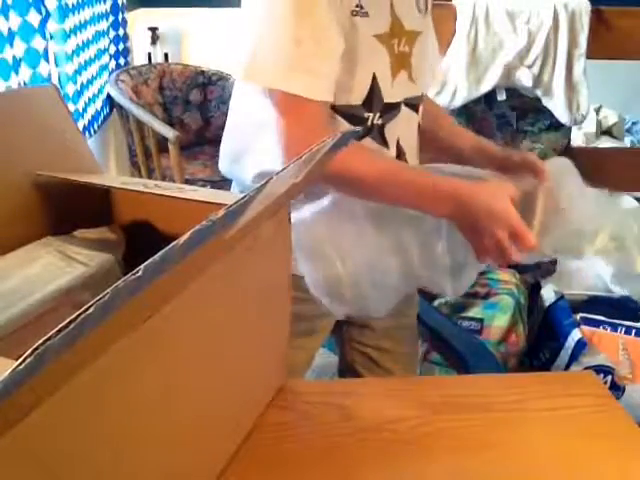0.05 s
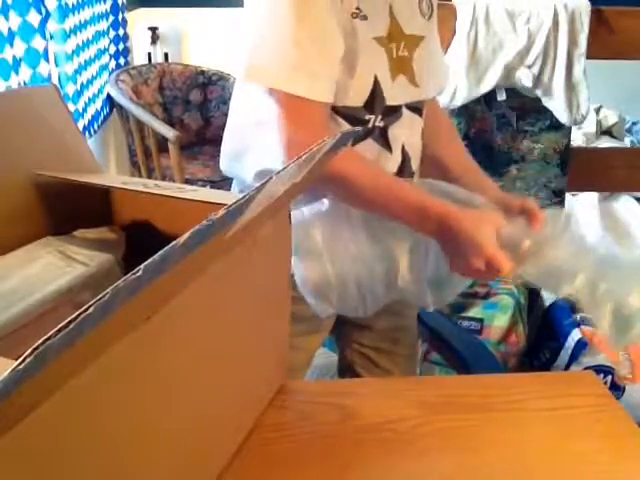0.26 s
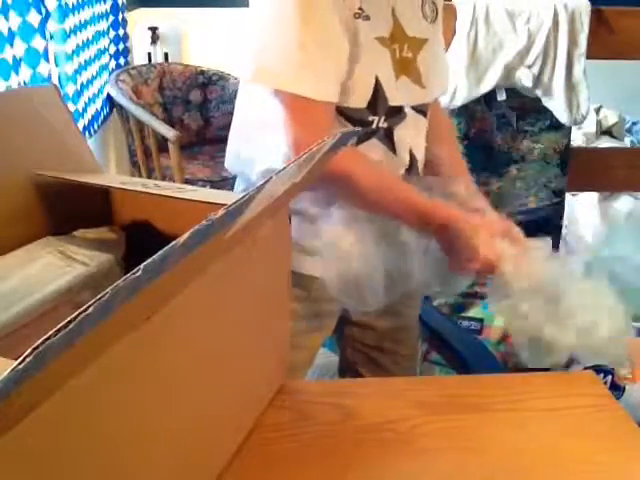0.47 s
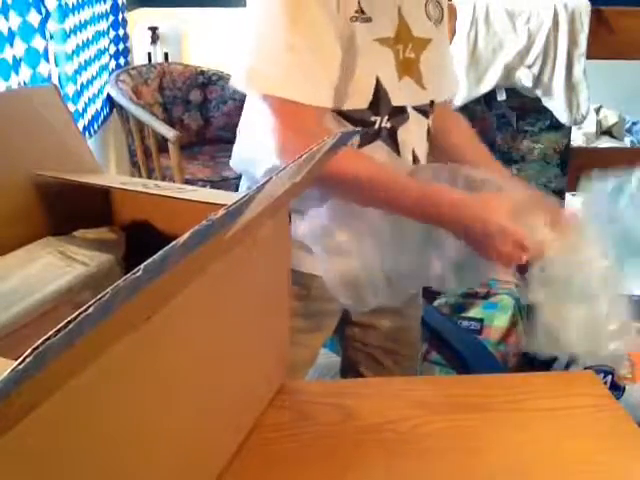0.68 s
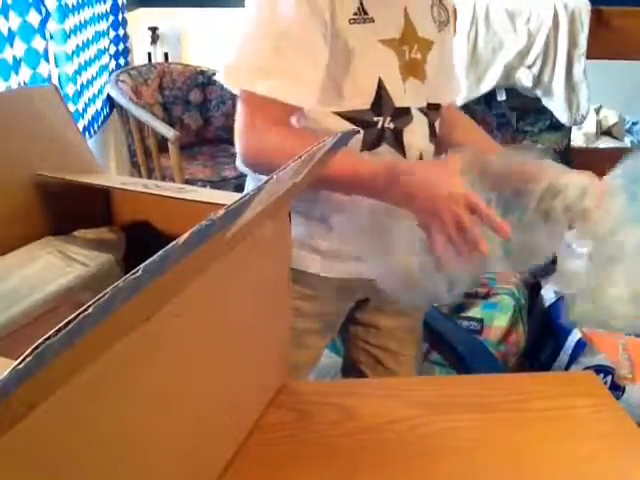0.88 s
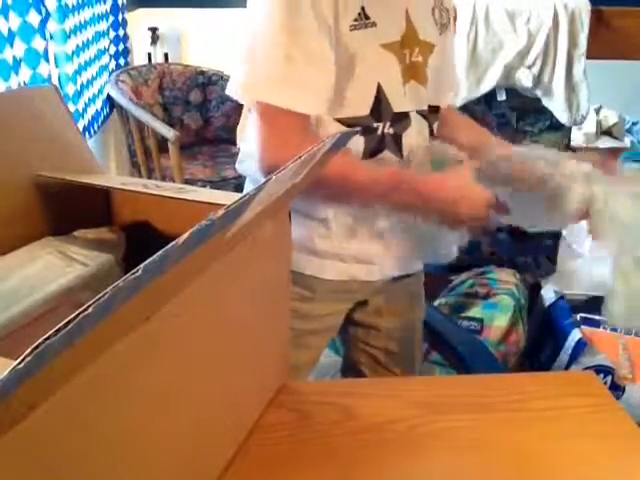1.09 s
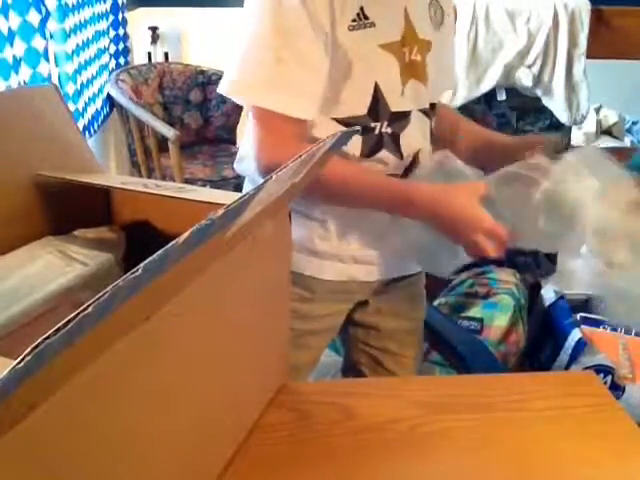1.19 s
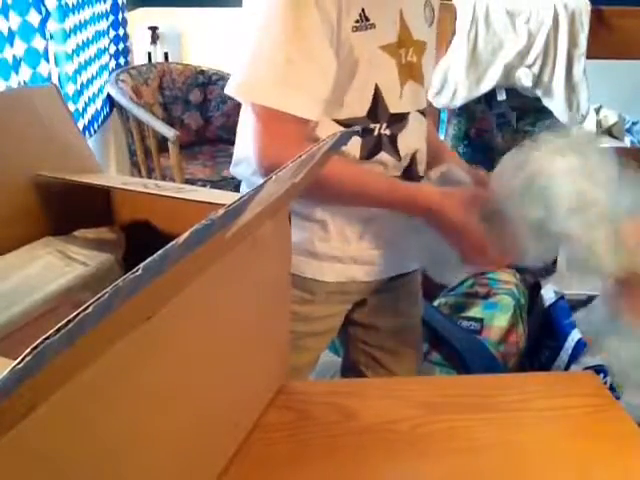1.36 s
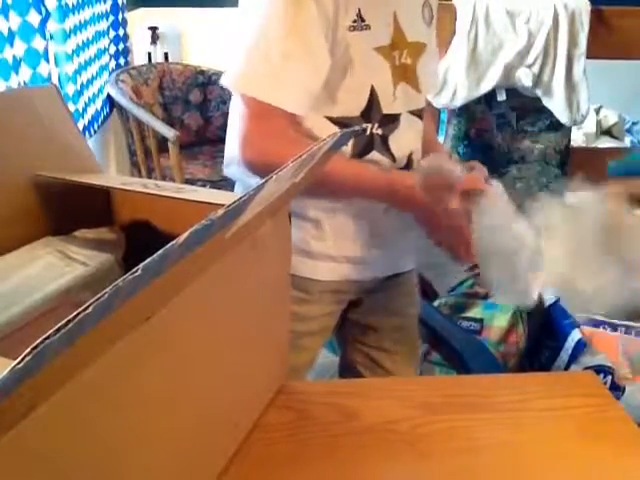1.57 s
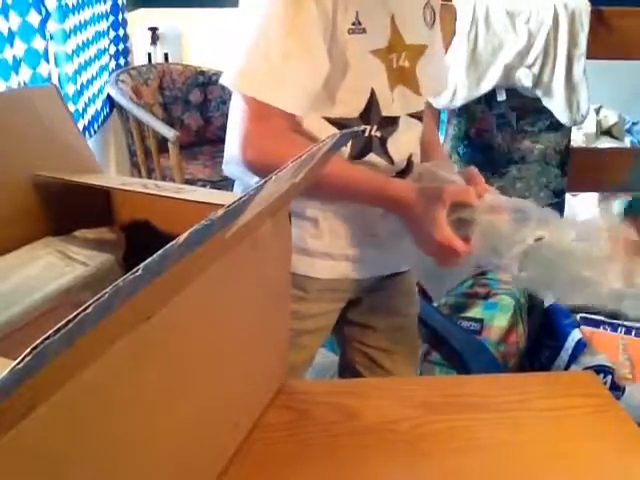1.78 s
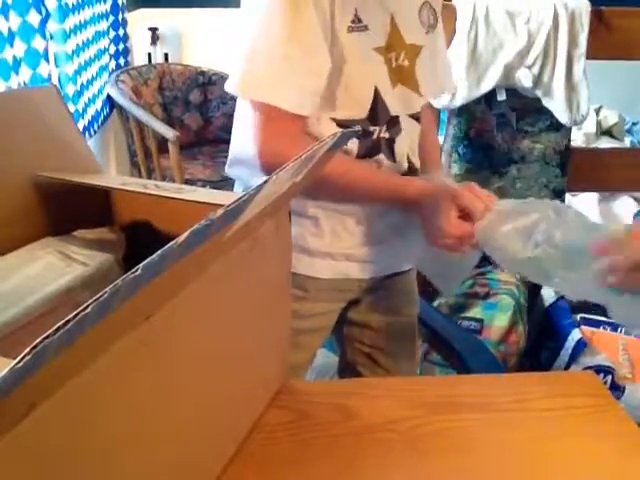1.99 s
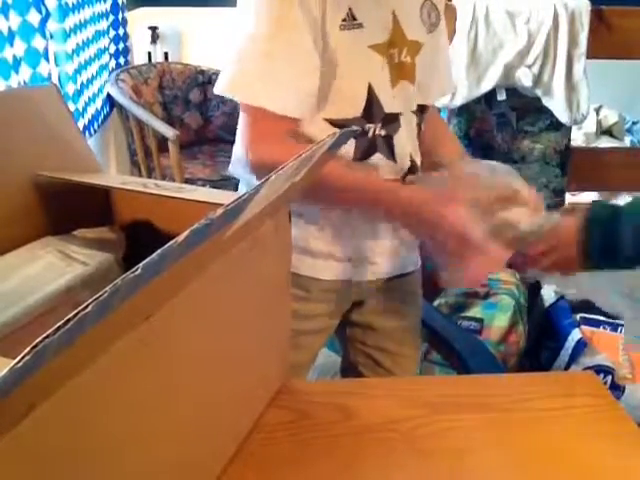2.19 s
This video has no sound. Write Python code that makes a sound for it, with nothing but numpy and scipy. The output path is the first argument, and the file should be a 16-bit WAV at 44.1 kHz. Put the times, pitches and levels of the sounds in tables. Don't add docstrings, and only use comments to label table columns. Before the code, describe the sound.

Hands twist air-filled plastic packaging about a metre from a phone microphone: two hollow cracking bursts, restless crinkling, a dense run of creaks and bright ticks, then one overloaded bang with short indoor reverberation.

```python
import sys
import numpy as np
from scipy import signal
from scipy.fft import rfft, irfft
from scipy.io import wavfile
from scipy.ndimage import uniform_filter1d

SR = 44100
rng = np.random.default_rng(int(sys.argv[2]) if len(sys.argv) > 2 else 0)


def inscribe(sig):
    pcm = np.round(np.clip(np.atleast_2d(sig).T, -1, 1) * 32767)
    wavfile.write(sys.argv[1], SR, pcm.astype(np.int16))


def linear_from_db(decibels):
    return 10 ** (np.asarray(decibels, float) / 20)


N = 99225

BANDS_HZ = 60 * 2 ** np.arange(0, 8.5, .5)


def along(table, hz, col):
    table = np.array(table)
    return np.interp(np.log(hz), np.log(table[:, 0]), table[:, col])


def band(x, hz):
    f = np.maximum(np.arange(len(x) // 2 + 1) * SR / len(x), 1)
    octaves_off = np.clip(np.log2(f / hz), -.5, .5)
    return irfft(rfft(x) * np.cos(np.pi * octaves_off) ** 2, len(x))


def add(out, s, x):
    i = int(s * SR)
    out[i:i + len(x)] += x[:N - i]


def highpass(x, order, hz):
    return signal.sosfilt(signal.butter(order, hz, "high", fs=SR, output="sos"), x)


def walk(rate):
    hold = int(SR / rate)
    steps = np.repeat(rng.standard_normal(N // hold + 1), hold)
    return 1.3 * uniform_filter1d(uniform_filter1d(steps, hold), hold)[:N]


def rustle():
    # (time [s], rustle level [dB], dullness [dB per octave])
    handling = [(0, -43.5, 0.5), (.17, -39, -1), (.3, -51, 4.5), (.63, -51.5, 1.5), (0.748, -41, -0.5),
                (.88, -43.5, -0.4), (1.028, -34, -0.05), (1.19, -37.5, 0.3), (1.258, -33, -1),
                (1.34, -38, 1), (1.419, -29.5, -0.5), (1.52, -32, 2), (1.64, -30.5, -0.5), (1.76, -34, 0),
                (1.879, -29, -1), (2.07, -53.5, 9), (2.18, -39, 0.5), (2.25, -45.5, 0.5)]
    # (frequency [Hz], level [dB per Hz])
    film_colour = [(60, -62), (120, -5.5), (320, -1), (800, 0.5), (2100, 2.5), (6000, 2.5), (12000, 3.5),
                   (15500, 0.5)]
    folds_per_s, spread_db, flicker_db, rustle_db = 12000, 2.5, 1.1, 1.5
    t, hands = np.arange(N) / SR, np.array(handling)
    level = np.interp(t, hands[:, 0], hands[:, 1])
    dull = np.clip(np.interp(t, hands[:, 0], hands[:, 2]), -1.5, 1)

    shared_flicker = walk(13.8)
    chance = rng.random((3, N))
    snaps = chance[0] < folds_per_s / SR
    polarity = np.sign(chance[1] - .5)
    strength = linear_from_db(-spread_db * np.log(np.maximum(chance[2], 1 / 150)))
    folds = snaps * polarity * strength
    folds = folds / folds.std()

    out = 0
    for hz in BANDS_HZ:
        db = along(film_colour, hz, 1) + level + dull * np.log2(9000 / hz)
        db = db + flicker_db * (shared_flicker + walk(11.97))
        out = out + linear_from_db(db) * band(folds, hz)
    return out * linear_from_db(rustle_db)


def room(x, wet_db=0, direct=1):
    # (frequency [Hz], 60 dB decay time [s], tail level [dB])
    decay = [(78.7, .4, -4), (212, 0.38, -5.5), (524, 0.43, -11.5), (1000, 0.52, -11), (1740, 0.49, -9.5),
             (3600, 0.41, -11), (9440, 0.31, -15.5)]
    build_ms, early_db, early_ms = 0.75, 10, 8.4
    t = np.arange(SR) / SR
    noise = rng.standard_normal(len(t)) * np.sqrt(1000 / SR)
    tail = 0
    for hz in BANDS_HZ:
        fade_db = along(decay, hz, 2) - 60 * t / along(decay, hz, 1)
        tail = tail + linear_from_db(fade_db) * band(noise, hz)
    build = 1 - np.exp(-t * 1000 / build_ms)
    early = linear_from_db(early_db * np.exp(-t * 1000 / early_ms))
    response = tail * build * early * linear_from_db(wet_db)
    response[0] += direct
    return signal.fftconvolve(x, response)[:max(len(x), len(t))]


def ring(hz, q):
    t = np.arange(SR // 20) / SR
    y = np.sin(2 * np.pi * hz * t) * np.exp(-np.pi * hz * t / q)
    return y / y.max()


def creak_slips():
    # (time [s], peak level [dB], pitch [Hz])
    creak_events = [(0.325, -40, 760), (1.47, -11, 1340), (1.4861, -4, 1920), (1.4944, -8.5, 920),
                    (1.4981, -16, 860), (1.5154, -4, 1940), (1.524, -12, 2650), (1.529, -3.5, 3300),
                    (1.536, -6, 3220), (1.5383, -16, 3500), (1.5458, -6, 2040), (1.5496, -10.5, 1470),
                    (1.56, -33, 2500), (1.574, -10, 1330), (1.583, -36, 2200), (1.594, -36, 1220),
                    (1.608, -9.5, 2060), (1.614, -8.5, 2970), (1.624, -17, 1480), (1.64, -28.5, 2500),
                    (.105, -27, 1100)]
    creak_db, edge_db, body_db = -6.5, -2, -9
    squeeze_from_s, squeeze_to_s = 1.46, 1.525
    out, t = np.zeros(N), np.arange(SR // 20) / SR
    soft = signal.butter(2, 8000, fs=SR, output="sos")
    for s, db, hz in creak_events:
        edge = signal.sosfilt(soft, rng.standard_normal(len(t))) * np.exp(-t / 0.0014)
        slip = ring(hz, 1.8) + linear_from_db(edge_db) * edge
        if squeeze_from_s < s < squeeze_to_s:
            slip = slip - linear_from_db(body_db) * ring(320, 2.5)
        add(out, s, linear_from_db(db + creak_db) * slip)
    return out


def stretch_ticks():
    # (time [s], peak level [dB], pitch [Hz])
    tick_events = [(0.1328, -23, 6000), (0.1745, -15, 5110), (0.373, -22, 3840), (1.6712, -15, 3800),
                   (1.6768, -9, 3800), (1.6829, -8, 3900), (1.6892, -8, 4300), (1.6955, -17, 3840),
                   (1.702, -6, 4500), (1.7065, -16, 5150), (1.7091, -6, 4500), (1.7158, -11, 3700),
                   (1.7195, -13, 3300), (1.7284, -20, 4500)]
    tick_db = 2.5
    out = np.zeros(N)
    for s, db, hz in tick_events:
        add(out, s, -linear_from_db(db + tick_db) * ring(hz, 3.8))
    return highpass(out, 2, 2300)


def slips():
    creak_room_db, tick_room_db = -6, -4
    table_ms, table_db = .97, 0
    creaks, ticks = creak_slips(), stretch_ticks()
    out = room(creaks, creak_room_db) + room(ticks, tick_room_db)
    out = out + linear_from_db(table_db) * np.roll(creaks + ticks, int(table_ms * SR / 1000))
    return highpass(out, 2, 199)


def air_bursts():
    # (time [s], level [dB], lowest frequency [Hz], highest frequency [Hz])
    bursts = [
        (0.2022, 2, 315, 1097),
        (0.4512, -4.5, 259.5, 860),
        (1.9244, 2.5, 336, 1000),
    ]
    out = np.zeros(N)
    click = 1. * (np.arange(SR // 20) == 0)
    for s, db, lo_hz, hi_hz in bursts:
        push = signal.sosfilt(signal.butter(3, [lo_hz, hi_hz], "band", fs=SR, output="sos"), click)
        add(out, s, linear_from_db(db) * room(push / push.max()))
    return out


def seam_tears():
    # (time [s], level [dB], fade [ms], tilt [dB per octave])
    tears = [
        (0.2021, -12, 3.1, -2),
        (0.449, -9, 4.9, -0.5),
        (1.9254, -3.5, 1.2, -2.5),
    ]
    low_hz, snap_db, tear_room_db = 1100, 3.5, 22.5
    out, t = np.zeros(N), np.arange(SR // 20) / SR
    click = 1. * (np.arange(SR + len(t)) == 0)
    for s, db, fade_ms, tilt_db in tears:
        crack = rng.standard_normal(len(t)) * np.exp(-t * 1000 / fade_ms)
        crack[:4] = linear_from_db(snap_db)
        whole = np.pad(crack, (0, SR)) + room(click, tear_room_db, direct=0)
        bright = 0
        for hz in BANDS_HZ[BANDS_HZ > low_hz]:
            bright = bright + linear_from_db(tilt_db * np.log2(hz / low_hz)) * band(whole, hz)
        add(out, s, linear_from_db(db) * bright)
    return out


def boom():
    # (time [s], level [dB])
    jolts = [
        (0.202, -33.5),
        (0.45, -26),
        (1.001, -51),
        (1.149, -59),
        (1.479, -52),
        (1.731, -43.5),
        (1.928, -27.5),
    ]
    mode_hz, t60_s, rise_ms = 122, .5, 15
    out, t = np.zeros(N), np.arange(SR) / SR
    swell = (1 - np.exp(-t * 1000 / rise_ms)) ** 2 * np.sin(2 * np.pi * mode_hz * t)
    for s, db in jolts:
        add(out, s, linear_from_db(db - 60 * t / t60_s) * swell)
    return out


def scene():
    rustle_room_db, hiss_db = -14.5, -56
    film = room(rustle(), rustle_room_db) + slips() + air_bursts() + seam_tears()
    hiss = linear_from_db(hiss_db) * rng.standard_normal(N)
    return (film + boom() + hiss)[None]


def roll_off(x):
    return signal.sosfilt(signal.butter(12, 16440, fs=SR, output="sos"), x)


def record(dry):
    clip_top, clip_knee = .97, 5
    x = highpass(dry, 3, 135)
    x = x / (1 + np.abs(x / clip_top) ** clip_knee) ** (1 / clip_knee)
    x = signal.sosfiltfilt(signal.ellip(8, .1, 40, 15250, fs=SR, output="sos"), x)
    return roll_off(x)


dry = scene()
out = record(dry)
inscribe(out)
```